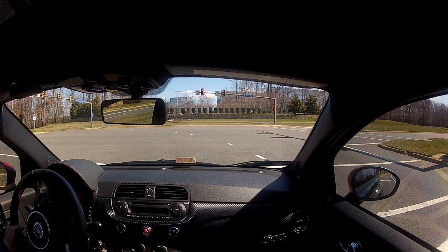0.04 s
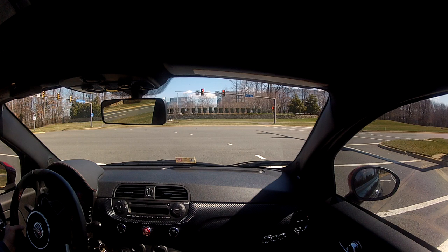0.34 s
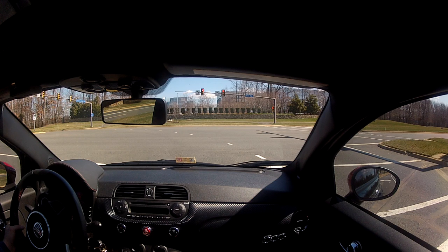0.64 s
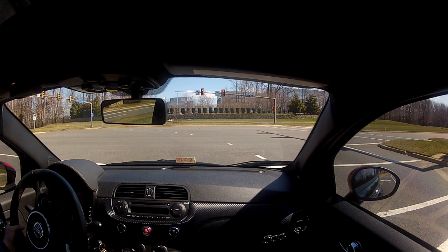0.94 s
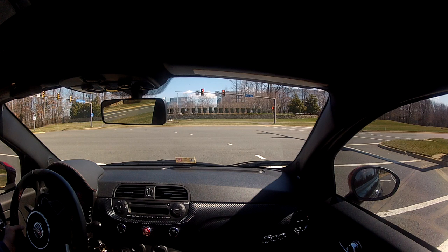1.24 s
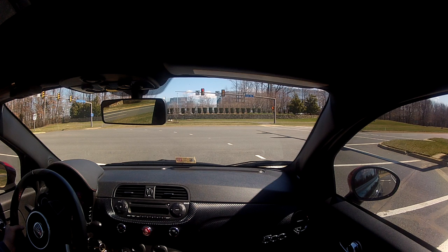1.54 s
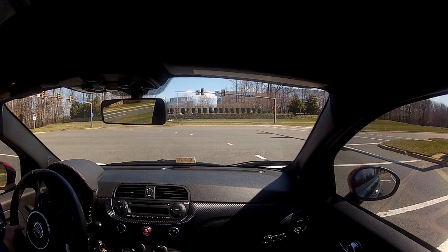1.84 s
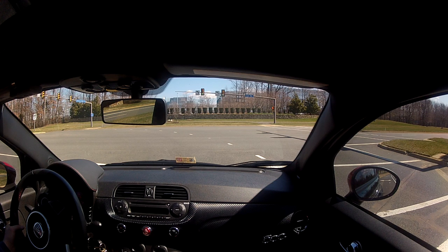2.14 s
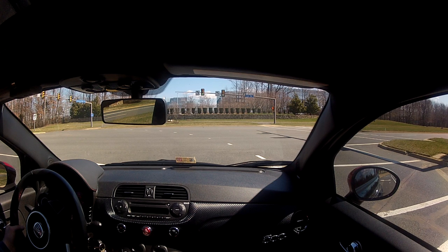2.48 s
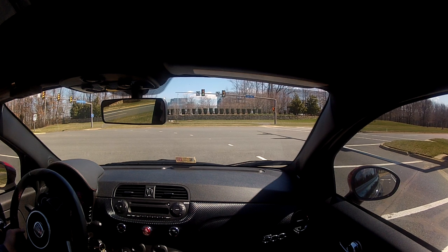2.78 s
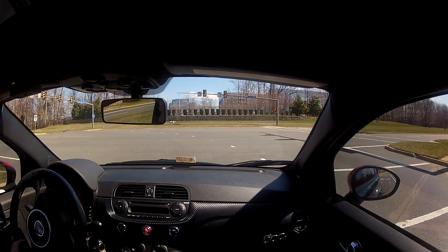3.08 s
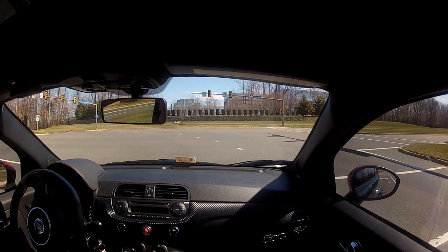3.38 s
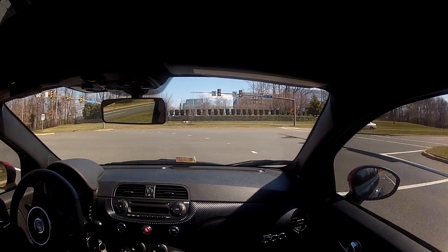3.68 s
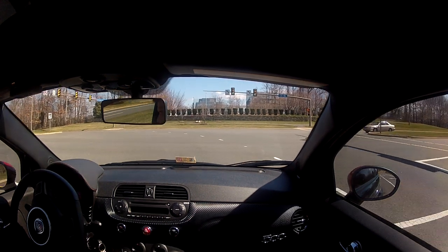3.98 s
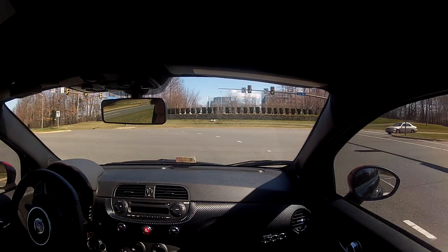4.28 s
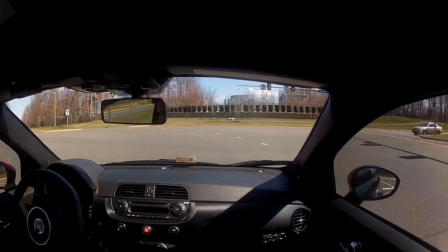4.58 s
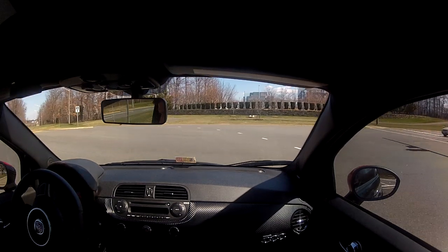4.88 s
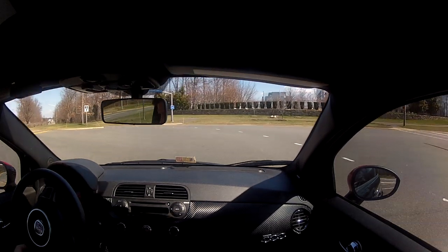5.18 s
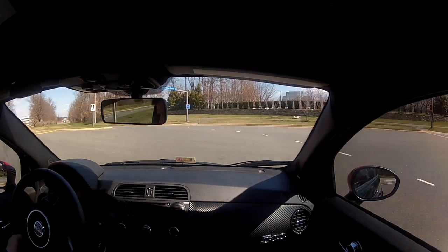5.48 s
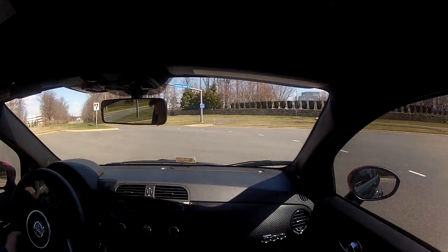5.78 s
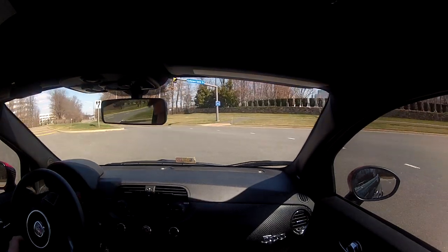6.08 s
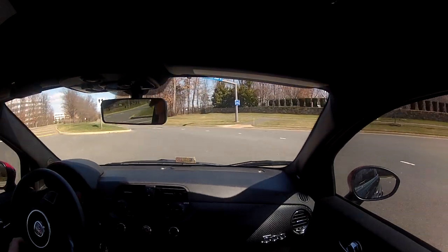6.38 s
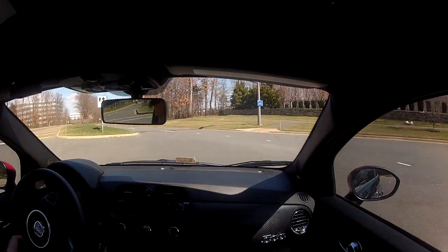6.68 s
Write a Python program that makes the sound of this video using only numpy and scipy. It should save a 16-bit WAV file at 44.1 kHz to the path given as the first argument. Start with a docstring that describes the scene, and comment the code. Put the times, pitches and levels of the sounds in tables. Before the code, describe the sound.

Inside a small car, a throaty engine idles quietly, then revs up and drives off with booming exhaust and tyre rumble.

```python
"""Inside a small four-cylinder car with a throaty exhaust. First it idles: each firing is a low thud, and
a thin sizzle near 12 kHz follows the engine over a faint hiss. At about 2.5 s it revs up: the exhaust
booms in the cabin, puffs rasp in the pipe and the valves tick. The clutch rubs softly as it takes up,
and the tyres rumble as the car gathers speed across a parking lot. Something hard clicks a few times,
loudest in the turn. Near 6 s the revs fall, then the engine pulls again."""
import sys
import numpy as np
from scipy import signal
from scipy.fft import rfft, irfft, next_fast_len
from scipy.io import wavfile
from scipy.ndimage import map_coordinates

SR = 44100
rng = np.random.default_rng(int(sys.argv[2]) if len(sys.argv) > 2 else 0)


def log_audio(samples):
    """Write samples as a 16-bit WAV file to the path given in sys.argv[1]."""
    # one column per channel
    frames = np.atleast_2d(samples).T
    # limit to full scale, then quantise
    limited = np.clip(frames, -1, 1)
    pcm = np.round(limited * 32767).astype(np.int16)
    wavfile.write(sys.argv[1], SR, pcm)


N = 301203
TIME = np.arange(N) / SR


def amp(db):
    """Turn decibels into a plain multiplier."""
    return 10 ** (np.asarray(db) / 20)


def unit(x):
    """Scale x to an average (rms) level of 1."""
    return x / np.sqrt(np.mean(x ** 2) + 1e-20)


def curve(rows):
    """Join (seconds, value) rows with straight lines, one value per sample."""
    return np.interp(TIME, *np.transpose(rows))


def wobble(rate):
    """A smooth curve through `rate` random values a second."""
    return map_coordinates(rng.standard_normal(int(N * rate / SR) + 4), [TIME * rate])


def coloured(x, points):
    """Filter x so that each frequency gets the gain of the (Hz, dB) points."""
    size = 2 * next_fast_len(N // 2 + SR // 4)
    hz, db = np.transpose(points)
    gain = amp(np.interp(np.log(np.fft.rfftfreq(size, 1 / SR) + 1), np.log(hz), db))
    # folding the cepstrum keeps the filter from ringing before a sound arrives
    cepstrum = irfft(np.log(gain), size)
    cepstrum[1:size // 2] *= 2
    cepstrum[size // 2 + 1:] = 0
    return irfft(rfft(x, size) * np.exp(rfft(cepstrum)), size)[:N]


def noise(points):
    """Noise at level 1, coloured by the (Hz, dB) points."""
    return unit(coloured(rng.standard_normal(N), points))


def resonate(x, modes, direct):
    """Let x ring the (Hz, width, dB) resonances; the share `direct` passes straight through."""
    size = next_fast_len(N + SR // 2)
    f = np.fft.rfftfreq(size, 1 / SR)
    ringing = sum(amp(db) * 1j * f * width / (hz * hz - f * f + 1j * f * width)
                  for hz, width, db in modes)
    return irfft(rfft(x, size) * (direct + ringing), size)[:N]


# How fast the engine runs. Each row: time in seconds, firings per second.
ENGINE_SPEED = [(0.0, 36.43), (1.96, 36.68), (2.2, 36.77), (2.4, 38.06), (2.49, 40.04), (2.61, 45.39),
                (2.7, 57.8), (2.79, 65.78), (2.89, 71.97), (3.01, 73.93), (3.25, 75.18), (3.48, 74.3),
                (3.82, 66.1), (3.99, 59.26), (4.07, 61.14), (4.22, 70.25), (4.41, 75.2), (4.77, 89.98),
                (5.1, 102.4), (5.76, 127.0), (6.07, 122.3), (6.43, 101.9), (6.49, 97.1), (6.58, 84.2),
                (6.7, 76.6), (6.83, 80.86)]

def crankshaft():
    """The crank times the engine: gives the running count of firings and their rate in Hz."""
    rate = curve(ENGINE_SPEED)
    return np.cumsum(rate) / SR, rate


# The idle sags just before the throttle opens, then fades. Each row: time in seconds, level in dB.
IDLE_LEVEL = [(0, -43.5), (2.15, -44), (2.32, -50), (2.5, -43), (2.65, -56), (2.8, -100)]
# The idle's tones. Each row: order (a multiple of the firing rate), relative level in dB.
IDLE_TONES = [(2.5, -16), (3.5, -5.5), (4, -2.5), (5, -5), (5.5, -24.5), (6, 2), (11, -18), (11.25, -15.5),
              (11.5, -15.5)]

def idle(firings):
    """The idle throbs; unequal cylinders put extra tones between the whole orders."""
    throb = sum(amp(db + 0.2 * wobble(2.4)) * np.sin(2 * np.pi * order * firings)
                for order, db in IDLE_TONES)
    return amp(curve(IDLE_LEVEL)) * unit(throb)


# How hard the engine works. Each row: time in seconds, load (above 0 pulling, below 0 pushed by the car).
ENGINE_LOAD = [(0, 0), (2.5, 0), (2.56, 0.15), (2.63, 0.76), (2.92, 1.3), (3.2, 0.97), (3.55, 1.293),
               (4.35, 0.97), (4.55, 0.54), (5.0, 0.8), (5.45, 0.5), (5.85, 0.68), (6.02, .1), (6.16, -0.94),
               (6.38, -0.38), (6.44, -0.13), (6.53, 0.73), (6.83, 0.84)]

def combustion(overrun):
    """The burn follows the load; only the share `overrun` is left when the car pushes the engine."""
    load = curve(ENGINE_LOAD)
    return np.maximum(load, -overrun * load)


# Low resonances of exhaust and cabin. Each row: centre in Hz, width in Hz, gain in dB.
BOOM_RESONANCES = [(77.1, 19.9, -21), (86, 20, -19), (109.9, 15.3, -15), (127.0, 9.6, -16),
                   (141.3, 49, -23.5), (185.4, 17.9, -15), (231.3, 20.1, -12), (284, 33, -18.5),
                   (403, 26, -24)]

def boom_gain(hz):
    """How strongly exhaust and cabin answer a pitch; it drops steeply beside each resonance."""
    answers = (amp(db) / (1 + ((hz - centre) / width) ** 2) ** 2 for centre, width, db in BOOM_RESONANCES)
    return np.sqrt(sum(answer ** 2 for answer in answers))


# The idle's thud. One value each for orders 1, 2 and 3: dB above the idle level.
THUD_LEVELS = [-5, -2.5, 7.5]

def boom(firings, rate, lag=1.77, uneven=0.035, flutter_db=0.45, coasting=0.15, order_fall_db=6):
    """The three lowest orders thud at idle, then swell and fade as they sweep through the resonances."""
    slip = lag * (rate / rate[0] - 1)  # the third order slips out of step as the revs rise
    idle_db = curve(IDLE_LEVEL)
    tone = 0
    for order, thud_db in enumerate(THUD_LEVELS, 1):
        # the first order follows the load in either direction; the others need combustion
        push = np.hypot(curve(ENGINE_LOAD), coasting) if order == 1 else combustion(overrun=0.11)
        swept = push * boom_gain(order * rate) * amp(-order_fall_db * (order - 1))
        level = np.hypot(swept, amp(idle_db + thud_db)) * amp(flutter_db * wobble(40))
        phase = 2 * np.pi * order * firings + slip * (order - 1) * (order - 2)
        tone += np.sqrt(2) * level * np.cos(phase)
    # unequal cylinders rock the level once per turn of the crank
    return tone * (1 + uneven * np.cos(np.pi * firings))


def surge(firings, sharpness):
    """A smooth swell at every firing."""
    return unit(np.exp(sharpness * np.cos(2 * np.pi * firings)))


# One value per cylinder: the relative strength of its puff at idle.
CYLINDER_STRENGTHS = [0.73, 1.0, .65, 1.7]

def pulses(firings, rate, scatter_db, skew, jitter):
    """One pulse per firing, early or late and strong or weak by cylinder and by chance."""
    number = np.arange(1, int(firings[-1]))
    pace = np.interp(number, firings, rate)
    # the cylinders run more evenly as the engine speeds up
    imbalance = (np.take(CYLINDER_STRENGTHS, number, mode="wrap") - 1) * rate[0] / pace
    due = number + skew * imbalance + jitter * rng.standard_normal(len(number))
    starts = np.interp(due, firings, np.arange(N)).astype(int)
    strength = (1 + imbalance) * amp(scatter_db * rng.standard_normal(len(starts))) / np.sqrt(pace)
    return unit(np.bincount(starts, strength, N))


def reflections(t60):
    """Dense random echoes that fade by 60 dB in t60 seconds."""
    t = np.arange(SR // 6) / SR
    return rng.standard_normal(len(t)) * amp(-60 * t / t60)


def pipe_echoes(x, t60, direct):
    """Reflections along the pipe spread each puff in time without changing its colour."""
    echo = reflections(t60)
    echo[0] += direct * np.linalg.norm(echo)
    colourless = irfft(np.exp(1j * np.angle(rfft(echo))))
    return unit(signal.fftconvolve(x, colourless)[:N])


# Resonances of pipe and cabin. Each row: centre in Hz, width in Hz, gain in dB.
PIPE_RESONANCES = [(277, 24, 4.5), (369, 42, -2), (421.7, 28, -1), (492.4, 14, 4), (568.6, 15, 3.5),
                   (626.5, 29, 0), (691, 8.1, 1), (755, 12, 4.5), (850, 11, 3.5)]
# The pipe's tone colour. Each row: frequency in Hz, gain in dB.
PIPE_COLOUR = [(150, -54), (230, -12), (290, -0.5), (370, -4), (440, -4.5), (505, -2), (620, -6),
               (720, -16), (850, -24.5), (1250, -29), (1750, -34.5), (4000, -66)]

def rasp(firings, rate, gas_db=-8.5, muffle_hz=500, idle_db=-56, octave_db=7, pulling_db=-43):
    """Puffs and rushing gas ring in the pipe: brighter with revs, louder with revs and load."""
    gas = surge(firings, sharpness=0.21) * rng.standard_normal(N)
    puffs = pulses(firings, rate, scatter_db=1, skew=0.12, jitter=0.0039)
    flow = pipe_echoes(puffs, t60=0.036, direct=0.44) + amp(gas_db) * gas
    bright = coloured(resonate(flow, PIPE_RESONANCES, direct=0.68), PIPE_COLOUR)
    dull = signal.sosfilt(signal.butter(3, muffle_hz, fs=SR, output="sos"), bright)
    revved = np.clip(rate / rate[0] - 1, 0, 1)
    effort = np.tanh(combustion(overrun=0.3) / 0.49)  # levels off at high load
    level = amp(idle_db + octave_db * np.log2(rate / rate[0])) + amp(pulling_db) * effort
    return level * (np.sqrt(revved) * unit(bright) + np.sqrt(1 - revved) * unit(dull))


# The hiss's tone colour. Each row: frequency in Hz, gain in dB.
HISS_COLOUR = [(100, 2), (900, 3), (1500, -0.5), (3000, -4), (5000, -9), (7000, -15), (10000, -13),
               (14000, -31)]

def hiss(level_db=-68.5):
    """A faint, steady hiss lies under everything."""
    return amp(level_db) * noise(HISS_COLOUR)


# Tone colours of the tyres' rumble and of the grit. Each row: frequency in Hz, gain in dB.
TYRE_COLOUR = [(12, -34), (28, 2.5), (50, -9.5), (90, 0.5), (140, -2), (220, -1), (300, -7.5), (500, -13.5),
               (900, -44), (2000, -82.5)]
GRIT_COLOUR = [(300, -5.5), (750, 14.5), (1200, 2.5), (2000, -2.5), (2900, 0.5), (4300, -6), (5500, -26.5),
               (7500, -7), (11000, -9.5), (14000, -24)]

def road(start_s=2, gather_s=1.54, standing_db=-48, rolling_db=-29.5, grit_db=-31, bumps_db=2.05):
    """A low rumble at rest grows with speed as the tyres roll over uneven asphalt and hiss on grit."""
    speed = 1 - np.exp(-np.maximum(TIME - start_s, 0) / gather_s)
    level = np.hypot(amp(standing_db), amp(rolling_db) * speed)
    rumble = amp(bumps_db * wobble(9)) * noise(TYRE_COLOUR)
    grit = amp(grit_db + wobble(9.8)) * noise(GRIT_COLOUR)
    return level * (rumble + grit)


# Clicks in the cabin. Each row: start in seconds, level in dB, seconds for the crack to fade 60 dB,
# seconds between bounces, dB lost per bounce, dB of the ring above the crack.
CLICK_EVENTS = [(2.401, -58, 0.035, .009, 17, -15), (2.956, -59, 0.041, 0.011, 7, -16.5),
                (4.710, -40.5, .045, .013, 10, -4.5), (5.208, -54.5, .024, .009, 20, -14.5),
                (5.261, -54.5, .034, 0.0098, 24, -12.5), (5.375, -56.5, .026, .009, 21, -13),
                (6.093, -44.5, .055, 0.01, 4, -9), (6.242, -48.5, .05, .006, 5, -7.5)]
# How the part rings. Each row: pitch in Hz, relative level in dB, seconds to fade 60 dB.
CLICK_TONES = [(1250, -20, .03), (1820, 1.5, .025), (2804, 4.5, 0.057), (2900, -11, 0.0064),
               (4620, -19.5, 0.046), (9220, -3.5, 0.058), (14750, -8.5, .045)]
# The crack's tone colour. Each row: frequency in Hz, gain in dB.
CRACK_COLOUR = [(300, -2), (1200, 6.5), (2000, 3), (2850, 6), (3800, -6), (5000, -4.5), (6000, -26.5),
                (7500, -8), (11000, -13), (15000, -10.5)]

def clicks(contacts=3):
    """A small hard part strikes and bounces; each contact is a short crack and a ring."""
    ring, bursts = np.zeros(N + SR), np.zeros(N + SR)
    t = np.arange(SR // 4) / SR
    for start_s, first_db, crack_t60, bounce_s, loss_db, ring_db in CLICK_EVENTS:
        for contact in range(contacts):
            start = round((start_s + contact * bounce_s) * SR)
            span = slice(start, start + len(t))
            db = first_db - contact * loss_db
            bursts[span] += amp(db - 60 * t / crack_t60)
            for hz, tone_db, t60 in CLICK_TONES:
                peak_db = db + ring_db + tone_db + rng.normal(0, 1)
                ring[span] += amp(peak_db - 60 * t / t60) * np.sin(2 * np.pi * hz * t)
    return ring[:N] + bursts[:N] * noise(CRACK_COLOUR)


def cabin_echoes(x, t60, direct):
    """Dense reflections between glass and trim smear every pulse."""
    echo = reflections(t60)
    echo[0] += direct * np.linalg.norm(echo)
    return unit(signal.fftconvolve(x, echo)[:N])


# How loud the engine bay is. Each row: time in seconds, level in dB.
BAY_LOUDNESS = [(0, -92), (2.2, -89), (2.6, -74.5), (2.78, -61), (3.4, -59.5), (4.03, -63.5), (4.25, -62),
                (4.9, -62), (5.92, -56), (6.15, -59), (6.42, -68), (6.62, -60), (6.83, -60.5)]
# Resonances of the engine block and the wall behind it. Each row: centre in Hz, width in Hz, gain in dB.
BAY_RESONANCES = [(860, 12, -10.5), (1003, 19, 6), (1064, 130, -1), (1228, 28, 9.5), (1345, 35, 1.5),
                  (1675, 22, 5), (1950, 41, 3.5), (2130, 41, 1.5), (2810, 50, -0.5), (2910, 61, 9),
                  (3010, 38, 6), (3580, 14, -2), (3600, 100, 3.5)]
# The bay's tone colour. Each row: frequency in Hz, gain in dB.
BAY_COLOUR = [(400, -18.5), (800, 1.5), (1300, 1.5), (1650, 1.5), (2400, -8.5), (2850, -11), (3400, -17.5),
              (5000, -14), (7000, -36.5), (9300, -15), (11000, -14.5), (13500, -32.5)]

def engine_bay(firings, rate, tick_db=-2):
    """Ticking valves and air rushing into the engine come through the wall to the cabin."""
    rush = surge(firings, sharpness=0.09) * rng.standard_normal(N) * amp(2.2 * wobble(25))
    valves = pulses(firings, rate, scatter_db=-4, skew=0.1, jitter=0.003)
    ticks = cabin_echoes(valves, t60=0.11, direct=0.14)
    body = resonate(rush + amp(tick_db) * ticks, BAY_RESONANCES, direct=0.74)
    return amp(curve(BAY_LOUDNESS)) * unit(coloured(body, BAY_COLOUR))


# The rubbing's tone colour. Each row: frequency in Hz, gain in dB.
CLUTCH_COLOUR = [(900, -23), (1750, 5.5), (2100, -0.5), (2600, -6), (3250, -9.5), (4500, -19.5),
                 (6000, -28)]

def clutch(firings, peak_s=3.3, width_s=0.25, peak_db=-66.5):
    """The slipping clutch rubs softly, swelling and fading as it takes up."""
    swell = np.exp(-0.5 * ((TIME - peak_s) / width_s) ** 2)
    return amp(peak_db) * swell * surge(firings, sharpness=0.23) * noise(CLUTCH_COLOUR)


def scene(pipe_delay_s=0.015):
    """Add the engine, road, clicks and hiss into one channel."""
    firings, rate = crankshaft()
    delayed = firings - pipe_delay_s * rate  # a puff travels down the pipe and back to the cabin
    exhaust = idle(firings) + boom(firings, rate) + rasp(delayed, rate)
    return (exhaust + engine_bay(firings, rate) + clutch(firings) + road() + clicks() + hiss())[None]


def record(dry, sizzle_hz=12000, sizzle_gain_db=2, top_hz=15170):
    """Add a thin sizzle that follows the low sound, then cut the highest treble."""
    low = signal.sosfilt(signal.butter(2, 900, fs=SR, output="sos"), dry)
    # multiplying by a high tone mirrors the low sound's slope to both sides of that tone
    carrier = np.cos(2 * np.pi * sizzle_hz * TIME)
    sizzle = amp(sizzle_gain_db) * np.gradient(low, axis=1) * carrier
    size = next_fast_len(N + SR // 4)
    passband = np.fft.rfftfreq(size, 1 / SR) < top_hz
    return irfft(rfft(dry + sizzle, size) * passband, size)[:, :N]


dry = scene()
out = record(dry)
log_audio(out)
```